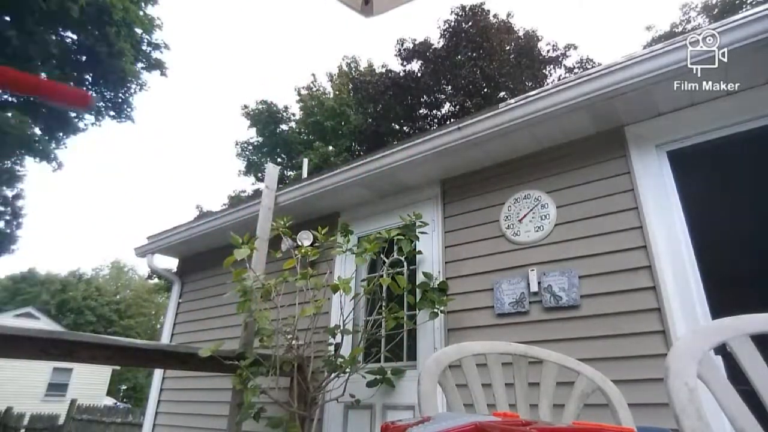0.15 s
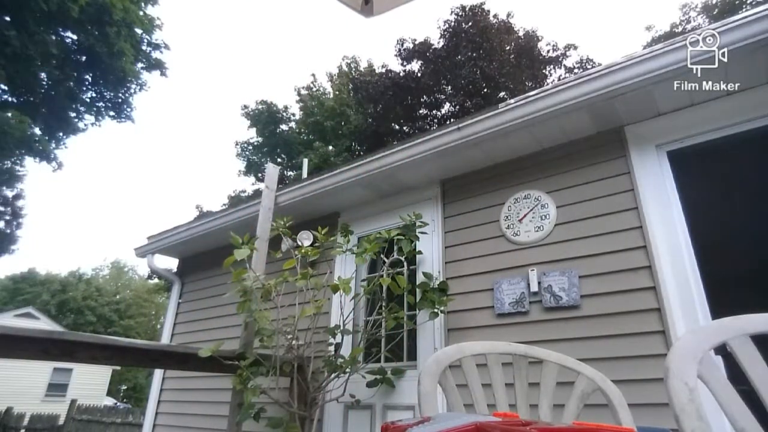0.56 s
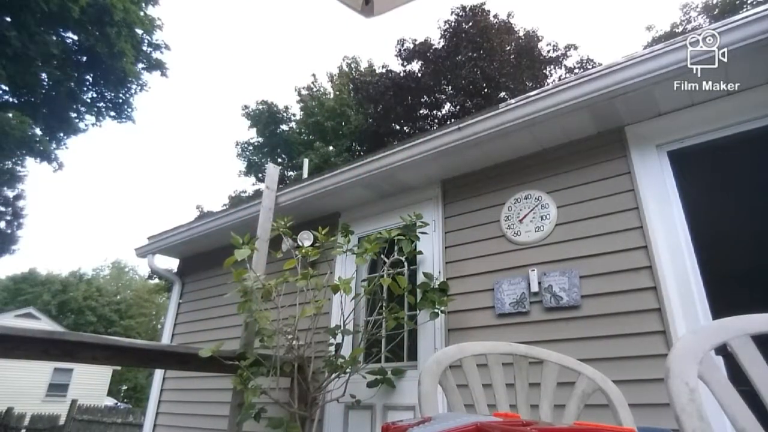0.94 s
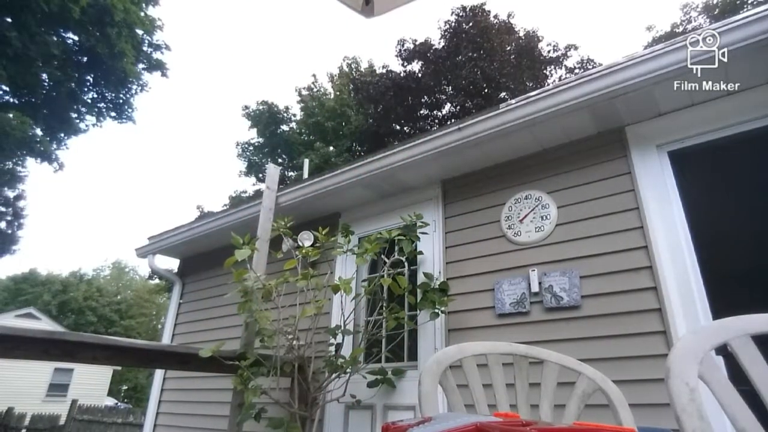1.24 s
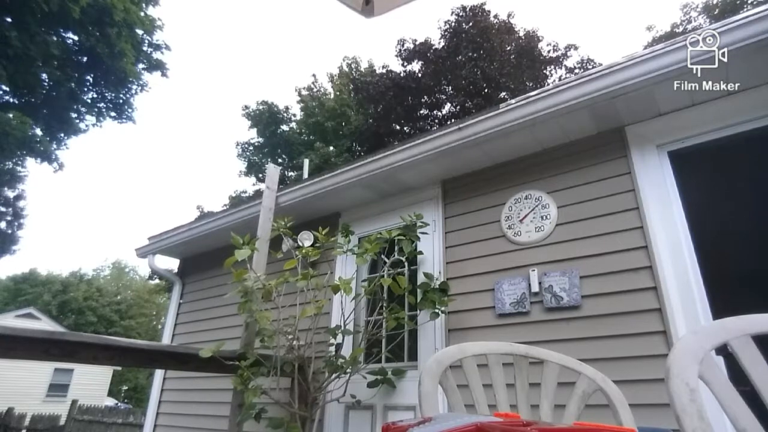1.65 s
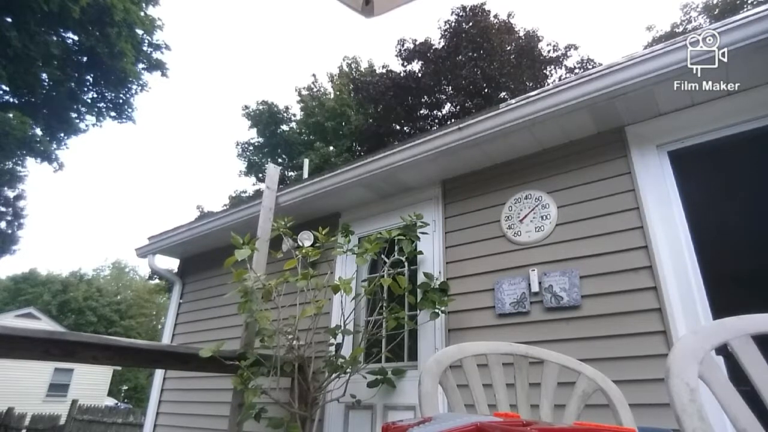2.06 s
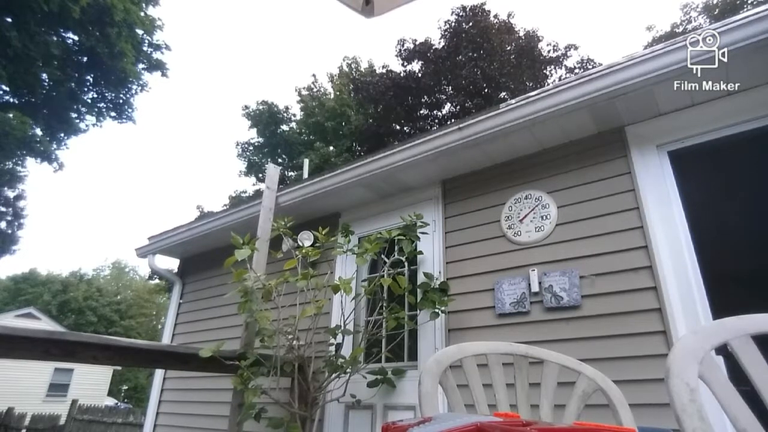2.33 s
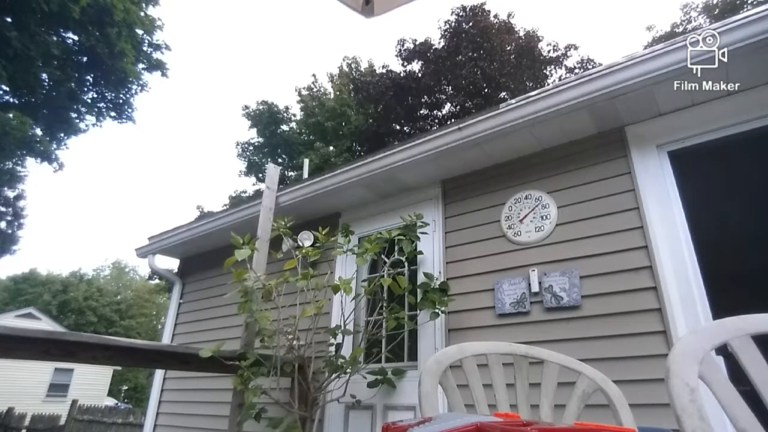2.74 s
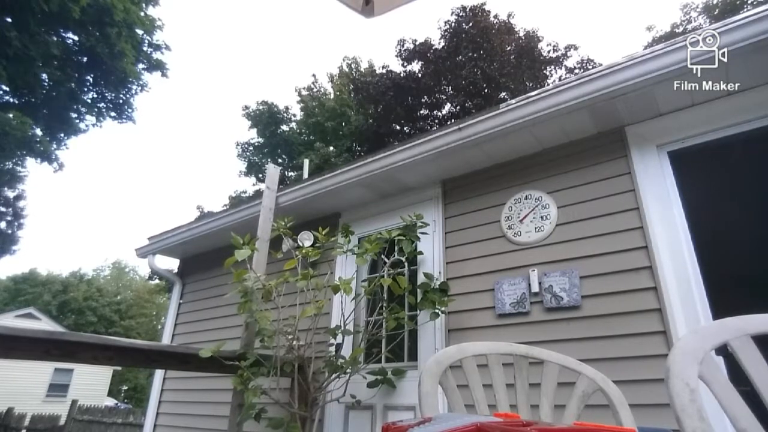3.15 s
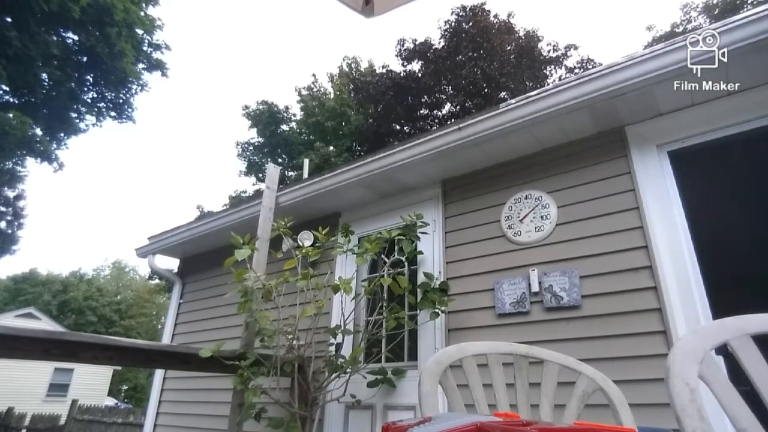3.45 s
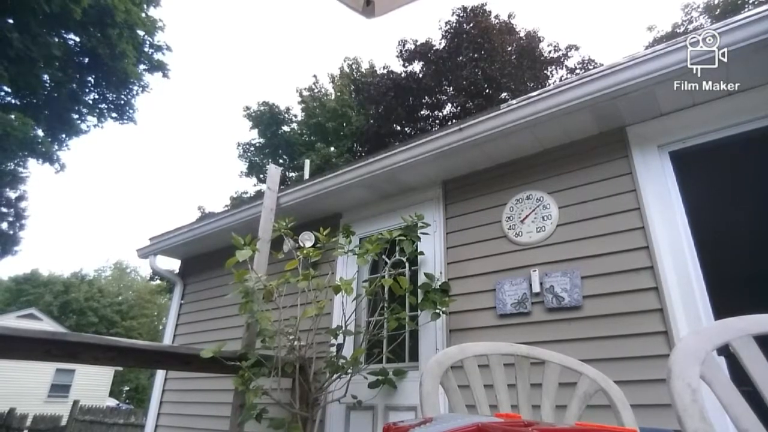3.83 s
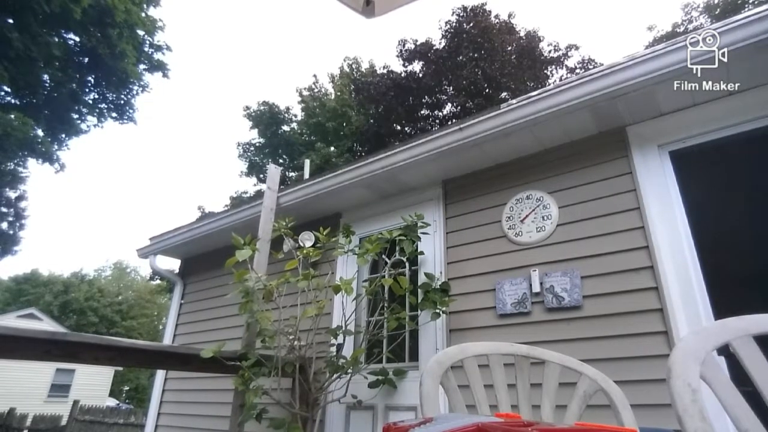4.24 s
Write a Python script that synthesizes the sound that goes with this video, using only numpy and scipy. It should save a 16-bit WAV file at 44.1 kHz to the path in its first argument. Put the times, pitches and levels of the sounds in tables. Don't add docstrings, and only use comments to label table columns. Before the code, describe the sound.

Close, lopsided stereo: deep fluttering table rumble mostly on the left, airy hiss on the right, soft garden wash behind. Hands knock and scrape light plastic for about a second, calm slightly, then the toy gun fires with a bright, saturated pop and a sharp cork impact just after. The recording ducks into a hush before low bumps, a creak and a plastic clack end it.

```python
import sys
import numpy as np
from scipy import signal
from scipy.fft import rfft, irfft, next_fast_len
from scipy.io import wavfile
from scipy.ndimage import uniform_filter1d

SR = 44100
rng = np.random.default_rng(int(sys.argv[2]) if len(sys.argv) > 2 else 0)


def dump_mix(stems):
    frames = np.atleast_2d(stems).T
    limited = np.clip(frames, -1, 1)
    pcm = np.round(limited * 32767).astype(np.int16)
    wavfile.write(sys.argv[1], SR, pcm)


N = 193775
T = np.arange(N) / SR

# (frequency [Hz], density [dB per Hz])
AIR_SPECTRUM = [(120, -28), (200, -10), (309, -3.5), (376, -4.5), (630, -19), (683, -18), (829, -23),
                (1060, -23.5), (2570, -43.5), (5400, -49.5), (6040, -42.5), (6990, -63), (9500, -62.5),
                (12400, -94), (20900, -120)]
# (frequency [Hz], left [dB], right [dB])
PORT_RESPONSE = [(99.6, -33.5, -26.5), (274, -17, -11), (393, 8, 4), (614, 6, 8.5), (870, -3.5, 1),
                 (1403, -20, -13), (2220, -40, -17), (3080, -41, -26.5), (5200, -42.5, -39),
                 (7020, -51, -43), (9700, -75.5, -35.5)]
# (frequency [Hz], density [dB per Hz])
CAVITY_SPECTRUM = [(5290, -57.5), (9000, -33.5), (10200, -20.5), (12300, 5.5), (13200, 1.5), (13900, 0),
                   (14600, -0.5), (15900, -19.5), (16400, -19.5), (16500, -39.5)]
# (time [s], peak [dB], body [Hz], twice left minus right [dB], cavity hiss [dB])
KNOCKS = [(0.046, -60, 662, 0.0, -50), (.447, -49, 700, -3, -72), (1.81, -54, 700, 0, -72),
          (.272, -44, 560, -4, -72), (.362, -42, 620, -4, -70), (0.374, -43, 501, -4.0, -69),
          (0.808, -40, 650, 5.0, -56), (0.849, -48, 662, -0.5, -67), (0.929, -52, 603, -0.5, -46),
          (.8005, -62, 600, 0, -49), (.658, -58, 700, 0, -48), (0.945, -55, 501, 2.0, -49),
          (1.202, -50, 430, 0, -72), (1.25, -48, 552, 2.5, -67), (1.283, -46, 587, -0.5, -68),
          (1.334, -50, 560, 1.0, -70), (1.62, -48, 595, 2.5, -69), (3.699, -55, 557, 2.5, -75),
          (3.757, -46, 595, 4.5, -73), (3.7846, -33, 600, 30, -67), (3.857, -44, 620, -2, -72),
          (3.918, -47, 900, 0.0, -70), (4.099, -55, 544, 1.0, -60)]
# (time [s], peak [dB], frequency [Hz], T60 [s], right port [dB])
TABLE_BUMPS = [(0.214, -19.5, 172, 0.17, -17), (0.363, -23, 150, 0.1, -23.5),
               (0.476, -20.5, 151.3, 0.074, -13), (.548, -9, 143, 0.055, -16),
               (0.644, -22, 111, 0.069, -22), (.815, -10, 80, 0.093, -31), (0.829, -11, 190, 0.028, -18),
               (.93, -25, 150, .1, -20), (1.56, -28, 150, .2, -8), (2.08, -33, 90, .15, -6),
               (2.49, -36, 135, .14, -3), (3.085, -46, 150, .4, -4), (3.545, -46, 150, .15, -6),
               (1.27, -18, 80.7, 0.14, -22.5), (2.255, -24, 95.1, 0.056, -13.5),
               (3.655, -22, 150, .15, -18), (3.724, -21.5, 89.3, 0.32, -25),
               (3.826, -15.5, 79.8, 0.14, -20), (3.86, -19, 140, .12, -20),
               (3.925, -17.5, 143, 0.045, -7.5), (3.976, -14, 155, 0.05, -22),
               (4.105, -23.5, 83.4, 0.25, -16.5)]
# (frequency [Hz], level [dB], T60 [s])
BARREL_MODES = [(391, -24.5, 0.11), (446, -25.5, 0.14), (290, -21.5, 0.022), (180, -30.5, .2),
                (630, -29, 0.24), (659, -18, 0.17), (880, -29.5, .14), (1030, -34, .2), (1154, -14, 0.1),
                (1140, -34.5, 0.25), (1160, -38, 0.22), (1410, -39.5, 0.1), (2250, -35, 0.03)]
# (frequency [Hz], level [dB], T60 [s])
PANEL_MODES = [(554, 3, .014), (731, 0, .015), (428, -2, .027), (390, -19, .09), (300, -27, .12),
               (500, -16, .13), (780, -24, .07), (1150, -6, .005), (1160, -25, .07), (1390, -23, .07),
               (1530, -24, .05), (1770, -26, .07), (1990, -10, .018), (2230, -26, .05)]
# (time after pop [s], level [dB])
COLUMN_SWELL = [
    (0, -20),
    (.0007, -10),
    (.0019, 2),
    (.003, 1),
    (.0057, -9),
    (.0085, -1),
    (.0103, -7),
    (.0115, -18),
    (.016, -200),
]
# (time [s], level [dB], T60 [s], brightest [Hz], left minus right [dB])
SKIN_SCUFFS = [(.274, -51, .2, 2300, -2), (.361, -48, .27, 2000, -3), (.443, -55, .16, 2200, -3),
               (.642, -53, .35, 2900, -4), (1.272, -56, .2, 2000, -1), (2.06, -51, .4, 400, 0),
               (.02, -53, .4, 450, 0), (3.602, -47, .3, 700, -1), (3.075, -60, .25, 450, 0),
               (1.18, -54, .5, 500, 0), (.52, -51, .2, 450, 0), (3.602, -61, .7, 1300, -1),
               (4.34, -54, .4, 550, 0), (3.86, -53, .25, 1800, -3), (.665, -54, .2, 1500, -4),
               (1.335, -58, .25, 1900, -1), (.812, -55, .3, 2300, -3), (3.918, -52, .3, 1400, -2)]
# (frequency [Hz], width [Hz], level [dB]))
PISTON_SLIP = (2.2645, .0065, [(1320, 350, -47), (2050, 500, -46), (2800, 700, -61), (4800, 3000, -66)])
# (frequency [Hz], density [dB per Hz])
SCUFF_SPECTRUM = [(250, -12), (450, -3), (1000, -9), (1600, -15), (2300, -21), (3500, -40)]
# (time [s], frequency [Hz], level [dB])
TAPS = [(.65, 1100, -55), (0.808, 1300, -49), (.808, 2900, -58), (.8085, 4300, -63), (0.848, 1940, -52),
        (.93, 2250, -53), (.928, 2900, -62), (0.946, 2630, -61), (.946, 4300, -66), (1.202, 1100, -57),
        (1.25, 900, -55), (1.277, 1550, -54), (1.334, 950, -55), (1.352, 1200, -58), (1.376, 1900, -61),
        (3.08, 2300, -67), (3.699, 1200, -61), (3.699, 1800, -63), (2.386, 2150, -48), (3.857, 1100, -57)]
# (time [s], level [dB])
TABLE_SHAKE = [(0, -49.5), (.09, -46), (.17, -33.5), (.45, -37), (.62, -34.5), (.9, -39), (1.12, -39.5),
               (1.4, -38), (1.96, -44), (2.27, -46), (2.6, -52.5), (2.98, -64.5), (3.2, -60.5), (3.55, -56),
               (3.67, -40), (3.79, -31.5), (3.98, -35.5), (4.39, -38.5)]
# (time [s], gain [dB])
BACKGROUND_GAIN = [(0, 0), (1.4, 1.33), (2.27, 0), (2.285, 0), (2.5, -17), (2.6, -31), (2.7, -22),
                   (2.85, -29.5), (3.05, -34), (3.42, -30), (3.57, -18), (3.64, -14.5), (3.78, 0),
                   (3.95, 0.5), (4.39, 1)]
# (level [dB], share of the gain [dB/dB], share of the shaking [dB/dB], share of rubs [dB])
AIR_RANGES = [
    (-59, .6, 0.68, -5),
    (-69, 3.6, 0.052, -15.5),
    (-84, 2.3, 0.024, -30),
    (-75.5, 1.2, 0.23, -1.5),
]
# (time [s], rise [s], hold [s], T60 [s], level [dB])
PORT_RUBS = [(0.026, 0.015, .005, 0.43, -59), (0.212, 0.0044, 0.014, 0.04, -68),
             (0.512, 0.0043, 0.023, 0.083, -68), (0.57, 0.0012, 0.002, 0.066, -71),
             (0.633, 0.023, 0.079, 0.25, -56), (0.667, 0.024, 0.019, 0.14, -48.5),
             (0.793, 0.0025, .004, 0.29, -58), (0.973, 0.022, 0.032, 0.23, -65.5),
             (1.228, 0.0089, 0.013, 0.085, -67), (3.07, 0.0058, .01, 0.12, -85),
             (4.262, 0.047, 0.013, 0.17, -67), (4.358, 0.022, .01, .1, -72)]
# (time [s], level [dB], rise [ms], T60 [s], cavity hiss [dB])
AIR_JETS = [(2.253, -52.5, 9.6, 0.041, -28.5), (2.291, -72.5, 0.44, 0.015, -39),
            (2.2974, -24, 0.38, 0.03, -17), (2.3, -26.5, 0.61, 0.028, -19.5), (2.303, -39, 2, 0.078, -38.5),
            (2.3135, -21.5, 0.6, 0.032, -20), (2.313, -23.5, 0.43, 0.027, -21.5),
            (2.3862, -42, 1.0, 0.023, -41), (2.482, -31, 0.29, 0.049, -28),
            (2.493, -45.5, 1.01, 0.034, -33), (2.51, -59.5, 6.4, 0.28, -52.5),
            (2.581, -61.5, 1.5, 0.042, -61.5), (3.077, -71, 5, 0.067, -81)]
# (time [s], level [dB], rise [ms], T60 [s], cavity hiss [dB])
YARD_ECHOES = [
    (2.321, -27.5, 2.7, 0.17, -33.5),
    (2.351, -44, 8.9, 0.42, -58),
    (2.483, -33, 1.5, 0.12, -37.5),
    (2.497, -55, 3, 0.56, -69),
    (3.07, -67.5, 2.04, 0.22, -86),
]
# (time [s], rise [s], hold [s], T60 [s], level [dB])
HAND_LEANS = [
    (0.096, 0.061, 0.15, 0.43, -35.5),
    (0.352, 0.012, 0.025, 0.26, -32),
    (0.815, 0.032, 0.018, 0.27, -36.5),
    (1.233, 0.024, 0.11, 0.19, -35.5),
    (2.39, 0.023, 0.069, 0.67, -52.5),
    (3.079, 0.011, 0.041, 0.59, -52.5),
    (3.495, 0.024, 0.036, .3, -52.5),
    (3.588, 0.037, 0.099, 0.76, -38),
    (3.846, 0.026, 0.11, 0.27, -37.5),
]

CAVITY_LEFT_DB = -37
LAG = 28
CALM_DB = -46
POP_S, SMACK_S = 2.2978, 2.48165


def undb(db):
    return np.exp(np.asarray(db) * (np.log(10) / 20))


def ports(left_db, right_db):
    return undb([[left_db], [right_db]])


def unit(x):
    return x / np.sqrt(np.mean(x ** 2, axis=-1, keepdims=True))


def colour(x, hz, db):
    size = next_fast_len(N + 4096)
    f = np.arange(size // 2 + 1) * SR / size + 1
    cepstrum = irfft(np.interp(np.log(f), np.log(hz), db) * np.log(10) / 20, size)
    cepstrum[1:size // 2] *= 2
    cepstrum[size // 2 + 1:] = 0
    return irfft(rfft(x, size) * np.exp(rfft(cepstrum)), size)[..., :N]


def band(x, lo, hi):
    sos = signal.butter(3, [lo, hi], "band", fs=SR, output="sos")
    return unit(signal.sosfilt(sos, x))


def curve(rows):
    return np.interp(T, *np.transpose(rows))


def walk(rate_hz):
    k = int(SR / rate_hz)
    held = np.repeat(rng.standard_normal(N // k + 1), k)
    return unit(uniform_filter1d(held, k)[:N])


def since(s):
    return np.maximum(T - s, 0)


def ring(s, hz, t60, rise):
    out = np.zeros(N)
    span = slice(int(s * SR), int((s + 2 * t60) * SR))
    t = np.maximum(T[span] - s, 0)
    out[span] = np.sin(2 * np.pi * hz * t) * undb(-60 * t / t60) * (1 - np.exp(-t / rise))
    return out


def chirp(s, first_hz, last_hz, glide):
    t = since(s)
    cycles = last_hz * t - (last_hz - first_hz) * glide * (1 - np.exp(-t / glide))
    return np.sin(2 * np.pi * cycles)


def stroke(s, rise, hold, t60, db):
    out = np.zeros(N)
    span = slice(int(s * SR), int((s + rise + hold + 2 * t60) * SR))
    t = np.maximum(T[span] - s, 0)
    decay_db = -60 * np.maximum(t - rise - hold, 0) / t60
    out[span] = np.minimum(t / rise, 1) ** 2 * undb(db + decay_db)
    return out


def pair(alike):
    shared, left, right = rng.standard_normal((3, N))
    common = np.array([np.roll(shared, LAG), shared])
    return np.sqrt(alike) * common + np.sqrt(1 - alike) * np.array([left, right])


def whistle(gain):
    hiss = unit(colour(rng.standard_normal((2, N)), *np.transpose(CAVITY_SPECTRUM)))
    return 2 * hiss * gain * ports(CAVITY_LEFT_DB, 0)


def self_noise():
    return undb(-91) * rng.standard_normal((2, N)) + undb(-98) * band(pair(.2), 700, 2400)


def air():
    gain_db = curve(BACKGROUND_GAIN)
    stir_db = np.maximum(curve(TABLE_SHAKE) - CALM_DB, 0)
    rubs = sum(stroke(*row) ** 2 for row in PORT_RUBS)
    levels = []
    for db, ducked, shaken, rub_db in AIR_RANGES:
        power = undb(2 * (db + ducked * gain_db + shaken * stir_db))
        levels.append(np.sqrt(power + rubs * undb(2 * rub_db)))
    low, middle, upper, hiss = levels
    wash = colour(pair(0.18), *np.transpose(AIR_SPECTRUM))
    out = band(wash, 260, 700) * low * undb(2.2 * walk(45) + [[2.5], [1.5]])
    out = out + band(wash, 700, 2500) * middle * undb(0.84 * walk(27) + [[.5], [2.5]])
    out = out + band(wash, 2500, 9000) * upper * undb(1.5 * walk(34) + 2.5)
    left_hiss = band(rng.standard_normal(N), 13000, 15500) * upper * undb(9.0)
    return out + whistle(hiss * undb(2.0 * walk(41))) + [left_hiss, 0 * left_hiss]


def rumble():
    deep_db = curve(TABLE_SHAKE)
    boom_db = -51 + 0.62 * (deep_db - CALM_DB)
    pan_db = 4 + 0.38 * np.maximum(deep_db - CALM_DB, 0) + 4.5 * walk(9.1)
    deep = band(pair(0.14), 12, 130) * undb(deep_db + 2.61 * walk(18) - 1.0)
    boom = band(pair(0.039), 79, 247.5) * undb(boom_db + 5.1 * walk(25) - 2.5)
    out = deep * np.array([np.full(N, 2.0), undb(-pan_db)])
    out = out + boom * np.array([np.ones(N), undb(-.6 * pan_db - 4.5)])
    out = out * undb(-3.5 * np.exp(-since(POP_S) / .2) * (T > POP_S))
    rattle = undb(0.97 * walk(90))
    for s, db, hz, t60, right_db in TABLE_BUMPS:
        out = out + undb(db) * ring(s, hz, t60, rise=0.002) * rattle * ports(0, right_db)
    out = out + ring(3.7868, 68, .17, rise=.002) * ports(-8, -27)
    start, stop, hz, db = .56, .655, 143, -19.5
    swell = np.clip(since(start) / 0.022, 0, 1) * np.clip(1 - since(stop) / 0.02, 0, 1)
    buzz = np.sin(2 * np.pi * hz * since(start)) * swell * undb(db + 1.5 + 1.6 * walk(40))
    return out + buzz * ports(0, -22)


def leans():
    swell = np.sqrt(sum(stroke(*row) ** 2 for row in HAND_LEANS))
    return band(pair(.3), 98, 250) * swell * undb(0.74 * walk(40) + [[3], [-8]])


def creak():
    swell = stroke(3.6, rise=0.006, hold=0.05, t60=.35, db=-67)
    return band(pair(.5), 990, 1157) * swell * undb(2.5 * walk(97) + [[-2], [1.5]])


def scuffs():
    grit = colour(pair(0.18), *np.transpose(SCUFF_SPECTRUM)) * undb(1.6 * walk(310))
    out = 0
    for s, db, t60, top_hz, pan_db in SKIN_SCUFFS:
        shape = (1 - np.exp(-since(s) / .0015)) * undb(db - 60 * since(s) / t60)
        out = out + band(grit, 160, top_hz) * shape * ports(pan_db / 2, -pan_db / 2)
    return out


def ticks():
    out, sharp = 0, 0
    crunch = band(pair(.7), 450, 1100)
    for s, db, hz, pan_db, whistle_db in KNOCKS:
        t = since(s)
        knock = ring(s, hz, .028, rise=.0015) + .6 * ring(s, 1.4 * hz, .018, rise=.0015)
        knock = knock + 0.12 * crunch * undb(-60 * t / 0.042) * (1 - np.exp(-t / 0.0023))
        out = out + undb(db + 2.5) * knock * ports(pan_db / 4, -pan_db / 4)
        sharp = sharp + undb(whistle_db - 5.5 - 60 * t / 0.036) * (t > 0)
    return out + whistle(sharp)


def clicks():
    snap = band(pair(0.22), 700, 2300)
    out = 0
    for s, hz, db in TAPS:
        crack = snap * stroke(s, rise=0.00014, hold=.001, t60=0.023, db=-9)
        out = out + undb(db) * (ring(s, hz, t60=.01, rise=0.00057) + crack)
    return out * ports(-4, 2.5)


def leak():
    noise = rng.standard_normal((2, N))
    hiss = band(band(noise, 12400, 14600), 12400, 14600)
    hiss = hiss + undb(-30.5) * band(noise, 6600, 7300)
    swell = stroke(2.128, rise=.01, hold=.04, t60=.4, db=-61)
    return 2 * hiss * swell * undb(2.5 * walk(400)) * ports(CAVITY_LEFT_DB, 0)


def slip():
    s, half, modes = PISTON_SLIP
    rub = sum(undb(db) * band(pair(1.0), hz - width / 2, hz + width / 2) for hz, width, db in modes)
    swell = np.exp(-.5 * ((T - s) / half) ** 2) * undb(1.3 * walk(600))
    return rub * swell * ports(-13, 0)


def bursts():
    full, thin, sharp = np.zeros((3, N))
    rows = [(*jet, 0.83) for jet in AIR_JETS] + [(*echo, 0.13) for echo in YARD_ECHOES]
    for s, db, rise_ms, t60, whistle_db, share in rows:
        t = since(s)
        decay = undb(-120 * np.maximum(t - rise_ms / 1000, 0) / t60)
        shape = (1 - np.exp(-t / rise_ms * 1000)) ** 2 * decay
        full = full + shape * undb(2 * db) * (1 - share)
        thin = thin + shape * undb(2 * db) * share
        sharp = sharp + shape * undb(2 * whistle_db)
    grain = undb(1.5 * walk(700))
    noise = pair(0.48)
    hz, left_db, right_db = np.transpose(PORT_RESPONSE)
    tilt = 9 * np.log2(np.clip(hz / 2000, .1, 1))
    out = whistle(np.sqrt(sharp) * grain * undb(1.2 * walk(230)))
    for power, extra_db in ((full, 0), (thin, tilt + 14)):
        gust = np.sqrt(power) * grain
        left = colour(gust * noise[0], hz, left_db + extra_db)
        right = colour(gust * noise[1], hz, right_db + extra_db)
        out = out + 5 * np.array([left, right])
    return out


def air_column():
    first_hz, last_hz, glide, overtone = 300, 770, .0035, 3.1
    pop = chirp(POP_S, first_hz, last_hz, glide)
    pop = pop * undb(np.interp(since(POP_S), *np.transpose(COLUMN_SWELL)))
    fade = (1 - np.exp(-since(POP_S) / 0.0015)) ** 2
    fade = fade * undb(-24 - 60 * since(POP_S + 0.006) / .016)
    return pop + chirp(POP_S, overtone * first_hz, overtone * last_hz, 1.2 * glide) * fade


def piston_stroke():
    start = 2.3081
    swell = (1 - np.exp(-since(start) / .001)) * undb(-8 - 60 * since(start + .0035) / .014)
    return chirp(start, 600, 1700, glide=.008) * swell


def cork_smack():
    smack = -sum(undb(db - 10) * ring(SMACK_S, hz, t60, rise=.0011) for hz, db, t60 in PANEL_MODES)
    return signal.sosfilt(signal.butter(3, 240, "high", fs=SR, output="sos"), smack)


def shot():
    run_on = piston_stroke()
    landing = sum(undb(db) * ring(2.311, hz, t60, rise=.002) for hz, db, t60 in BARREL_MODES)
    blast = -undb(-9) * ring(2.2986, 290, .034, rise=.0006)
    smack = cork_smack()
    sound = air_column() + blast + run_on + landing
    left = sound - .6 * run_on - .25 * landing + undb(-4) * np.roll(smack, -10)
    muffled = signal.sosfilt(signal.butter(2, 950, fs=SR, output="sos"), left)
    return np.array([undb(2.5) * np.roll(muffled, LAG - 15), sound + smack])


def scene():
    background = self_noise() + air() + rumble()
    handling = leans() + creak() + scuffs() + ticks() + clicks()
    return background + handling + leak() + slip() + bursts() + shot()


def band_limit(x):
    return signal.sosfilt(signal.butter(12, 16970, fs=SR, output="sos"), x)


def record(dry):
    rounded = dry / (1 + np.abs(dry) ** 4) ** .25 * 1.03
    cut = signal.ellip(8, .2, 40, 15900, fs=SR, output="sos")
    return band_limit(signal.sosfilt(cut, rounded))


dry = scene()
out = record(dry)
dump_mix(out)
```